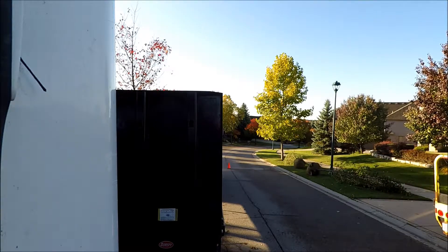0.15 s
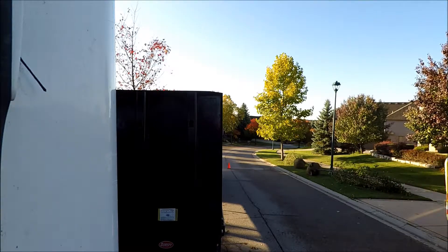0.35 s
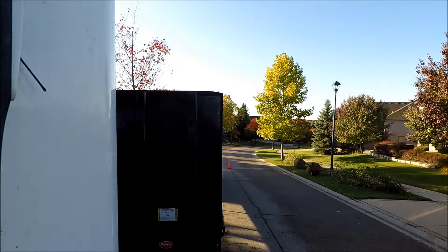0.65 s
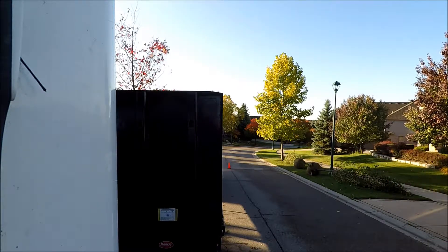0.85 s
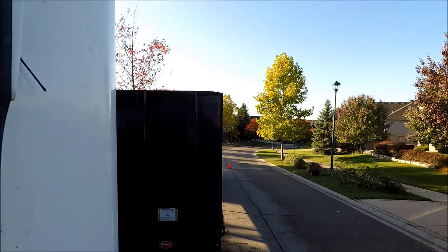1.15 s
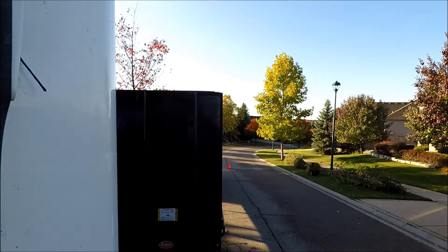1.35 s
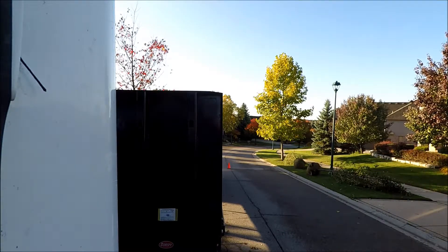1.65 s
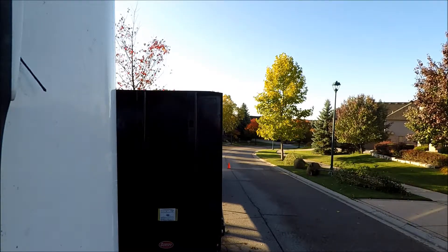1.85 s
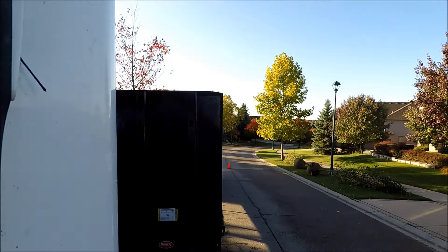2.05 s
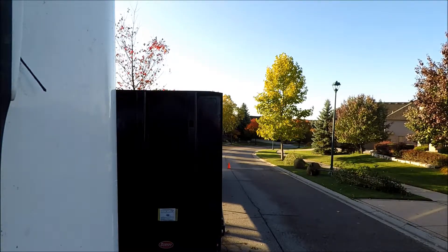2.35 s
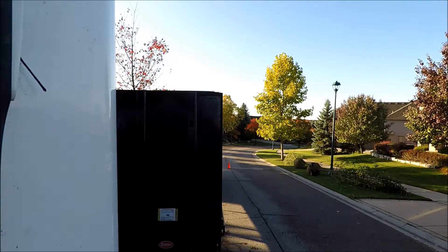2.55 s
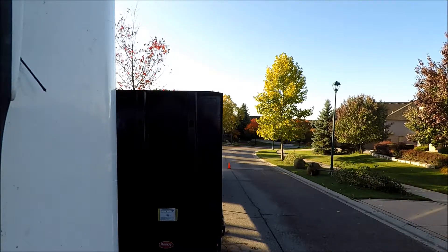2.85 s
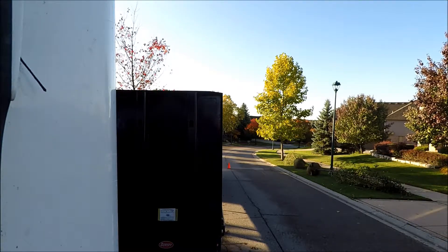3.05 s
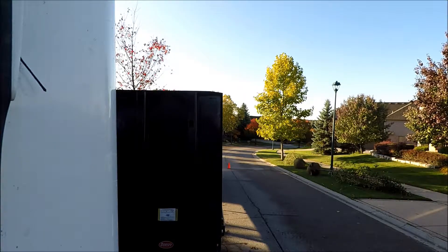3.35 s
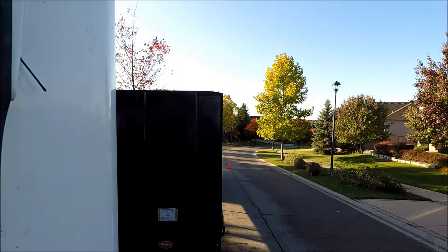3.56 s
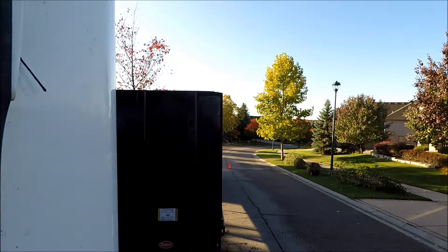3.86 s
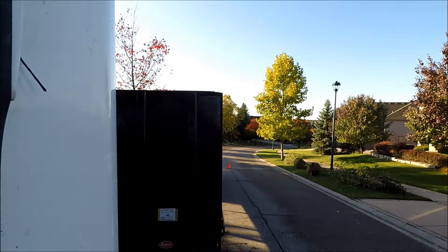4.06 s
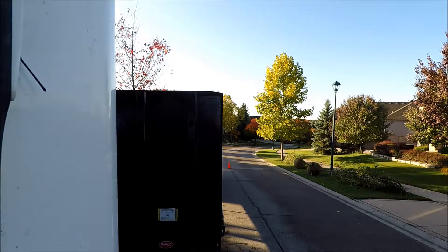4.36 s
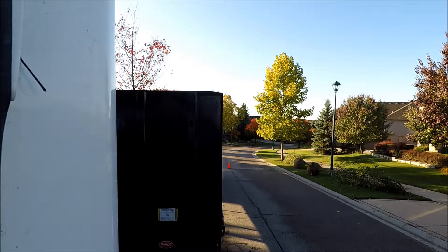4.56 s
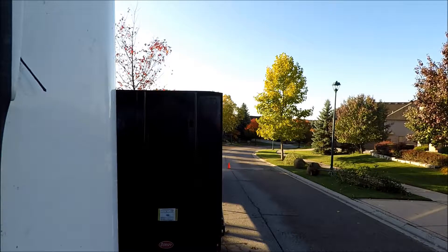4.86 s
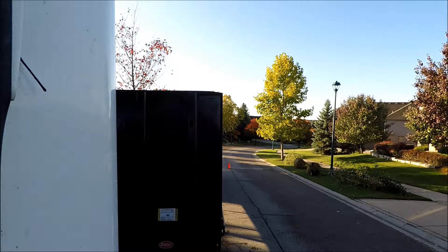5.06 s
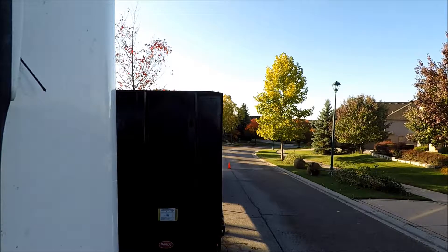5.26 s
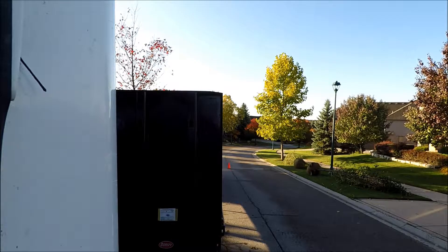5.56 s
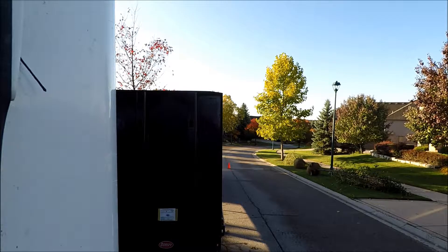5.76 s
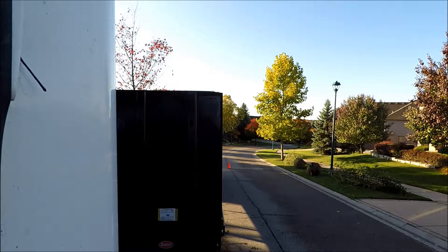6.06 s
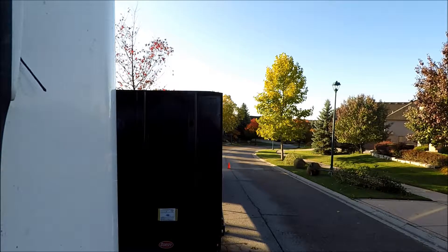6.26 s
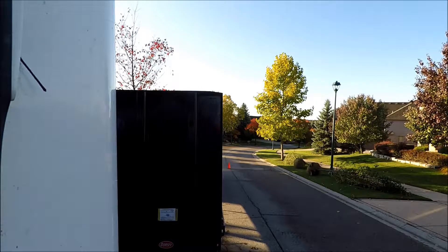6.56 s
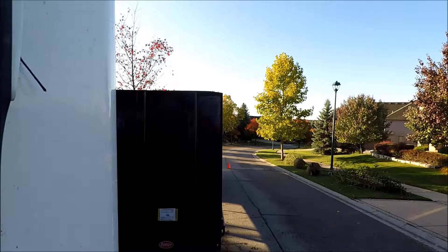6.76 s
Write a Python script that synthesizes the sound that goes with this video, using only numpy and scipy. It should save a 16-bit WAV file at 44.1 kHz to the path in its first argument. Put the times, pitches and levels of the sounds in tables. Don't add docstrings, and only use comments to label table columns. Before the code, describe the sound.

A heavy diesel truck starts close and loud, a low throbbing exhaust drone under coarse, bright clatter, with brief ringing from metal panels. Around 0.7 s several rapid hard knocks mark the load coming on and the engine pitch jumps upward. It holds, dips near 2.4 s, then climbs again until about 4 s, steadily fading with distance and losing its bright edge. Light wind pops hit the left side near 3.9 s. From 4.2 to 5.5 s the engine winds down, with very faint high brake squeaks around 5 s; it briefly picks up, then vanishes behind houses by 5.9 s. A second truck's slow, uneven idle is now plain beside the microphone, puttering and knocking, sagging then recovering near 6.3 s. A soft wind thump comes at 6 s, a sharp squeak at 6.3, left-side pops near 6.6, and a low rising body groan from 6.8 to the end.

```python
import sys
import numpy as np
from scipy import signal
from scipy.fft import rfft, irfft, next_fast_len
from scipy.io import wavfile
from scipy.ndimage import uniform_filter1d

SR = 44100
rng = np.random.default_rng(int(sys.argv[2]) if len(sys.argv) > 2 else 0)


def linear_from_db(decibels):
    return 10 ** (np.asarray(decibels, float) / 20)


def wav_out(sig):
    wavfile.write(sys.argv[1], SR, np.round(np.clip(np.atleast_2d(sig).T, -1, 1) * 32767).astype(np.int16))


N = 304290
T = np.arange(N) / SR
F = np.maximum(np.fft.rfftfreq(next_fast_len(N + 8192, True), 1 / SR), 1)
PAD = 2 * (len(F) - 1)

# frequency in Hz, level in dB per Hz.
CLATTER = [(600, -6.5), (900, -1.5), (1500, 0.5), (2900, -2), (3700, -1), (4300, -6.5), (5500, -5.5),
           (6800, -6.5), (7800, -14.5), (9000, -25.5), (10200, -20.5), (10900, -37.5), (12900, -29),
           (13700, -61)]
# frequency in Hz, lead in radians.
LEAD_NEAR = [(690, -.1), (1030, .8), (1380, 2.3), (2070, 4.2), (3450, 6.1), (4130, 7.3), (6200, 8.0),
             (7300, 9.6), (8300, 9.4), (8900, 12.6), (9550, 15.7), (10300, 17.2), (11500, 18.6),
             (13500, 18.8)]
# frequency in Hz, lead in radians.
LEAD_FAR = [(690, -.1), (1030, 1.7), (1380, 3.1), (2750, 5.6), (3300, 6.5), (4300, 11.3), (5340, 12.6),
            (6300, 9.8), (7500, 9.4), (8700, 12.8), (9500, 15.7), (10300, 18.2), (11000, 19.6),
            (13500, 18.8)]


def leaving_truck():
    # time in seconds, firing rate in Hz, load in dB.
    engine = [(0.0, 48.65, -1), (0.3, 49.98, -1), (0.67, 50.6, 0), (0.79, 55.0, 2), (0.89, 55.38, 0),
              (1.2, 54.64, 1), (1.87, 54.77, 1.1), (2.38, 51.14, -0.16), (2.9, 52.6, 0), (3.3, 53.37, 2.3),
              (3.7, 54.8, 0.5), (4.17, 54.6, 1), (4.39, 51.6, 0.5), (4.7, 47.9, .4), (5.17, 43.6, -1.2),
              (5.55, 42.97, -1.5), (5.7, 46.2, -8.5), (5.9, 48.4, 4)]
    # frequency in Hz, level in dB per Hz.
    rumble_colour = [(20, 15), (40, 5), (100, 8.5), (200, 7), (260, 4), (420, 7.5), (530, 1), (670, 2),
                     (820, -16), (1000, -37)]
    hz, load_db = curves(engine)
    rumble_db = -32.5 - 1.43 * T + 0.59 * load_db
    clatter_db = -29 - 2 * T + load_db
    gone = fade(-1, 5.88, 0.17)
    turns = np.cumsum(hz * (1 + 0.003 * walk(25))) / SR
    orders = exhaust_orders(turns, hz, load_db) + upper_orders(turns, rumble_db)
    rumble_swell = linear_from_db(rumble_db + 2.5 + 1.46 * walk(9)) * bursts(turns, 0.48, 0.24, 3.8)
    rumble = gas(gone * rumble_swell, rumble_colour)
    return ports(np.sqrt(2) * gone * orders) + rumble + block_clatter(turns, clatter_db, gone)


def exhaust_orders(turns, hz, load_db):
    out = np.zeros(N)
    for k in range(4):
        phase = (k + 1) * 2 * np.pi * turns + 0.16 * k ** 3
        out += linear_from_db(order_db(k + 1, hz, load_db)) * np.cos(phase)
    return out


def order_db(order, hz, load_db):
    # frequency in Hz, level in dB of an order at that pitch.
    pipe = [(43, -30.5), (55, -25), (87, -19), (110, -22), (148, -23), (166, -29.5), (182, -37.5),
            (205, -34.5)]
    # middle in seconds, order, half length in seconds,
    # gain in dB.
    echoes = [(0.903, 2, 0.17, -3), (.9, 3, 0.15, -3), (2.5, 1, .4, -3), (2.967, 3, .08, -8),
              (3.205, 2, 0.28, -2.5), (5.2, 3, 0.36, 2.5), (4.213, 2, .1, -9.5), (4.404, 2, 0.13, 4),
              (4.403, 3, .15, -3.5), (4.582, 1, 0.041, -17), (4.6, 2, 0.11, -6), (4.625, 3, 0.085, -11),
              (5.108, 2, .15, -6), (4.25, 1, 0.22, 3), (5.68, 1, .25, 14.5), (5.693, 2, 0.045, -14),
              (5.661, 3, 0.038, 9)]
    pipe_hz, pipe_db = np.transpose(pipe)
    db = np.interp(np.log(order * hz), np.log(pipe_hz), pipe_db)
    db = db + 0.95 * load_db - 1.08 * T
    db = db - 7.5 * fade(5.55, 9, 0.069)
    for s, k, half, gain_db in echoes:
        if round(k) == order:
            db = db + gain_db * fade(s - half, s + half, half)
    flutter_db = 0.3 + 0.08 * T
    return db + flutter_db * order / 2 * walk(20)


def upper_orders(turns, rumble_db):
    # multiple of the firing rate, level in dB under the rumble, start and end in seconds.
    upper = [(5, -9, 1, 1.07), (5.03, -7.5, 3.5, 5.2), (6, -12.5, 0, .7), (6.01, -7, 3.5, 4.35),
             (7.01, -9, 0.5, 3.5), (8.05, -9.5, 0, 3.9), (9.01, -13.5, 1, 3.31), (12, -16, 0.5, 5),
             (17.98, -12.5, 0.8, 2.38), (17.73, -13.5, 2.9, 3.5)]
    shivering = turns + 0.015 * walk(15)
    out = np.zeros(N)
    for k, db, start_s, end_s in upper:
        level = linear_from_db(db + rumble_db + 2.6 * walk(12))
        out += fade(start_s, end_s, 0.07) * level * np.sin(k * 2 * np.pi * shivering + k * k)
    return out


def block_clatter(turns, clatter_db, gone):
    # frequency in Hz, width in Hz, level in dB under the clatter.
    block_modes = [(1246, 33, -21), (1920, 58, -18), (2660, 380, -11.5), (3085, 120, -16.5),
                   (3700, 66, -19.5), (4520, 180, -22), (5400, 210, -18.5), (6100, 29, -20)]
    struck = turns + 0.45
    envelope = gone * linear_from_db(clatter_db + 1.5 + 0.4 * walk(6)) * bursts(struck, 0.52, 0.17, 1.7)
    far = fade(0.85, 9, 1.93)
    modes = linear_from_db(clatter_db + 0.7) * struck_modes(gone * blows(struck), block_modes)
    near_clatter = gas(envelope * np.sqrt(1 - far), CLATTER, LEAD_NEAR)
    far_clatter = gas(envelope * np.sqrt(far), shaded(CLATTER))
    return ports(modes) + near_clatter + far_clatter


def shaded(colour):
    # frequency in Hz, gain in dB.
    shade = [(900, 0.5), (1400, -1.5), (2500, 0), (3400, -3.5), (4100, 3), (5500, 0), (7300, 2),
             (9700, 0.5)]
    colour_hz, colour_db = np.transpose(colour)
    shade_hz, shade_db = np.transpose(shade)
    hz = np.sort(np.concatenate([colour_hz, shade_hz]))
    db = np.interp(np.log(hz), np.log(colour_hz), colour_db)
    db = db + np.interp(np.log(hz), np.log(shade_hz), shade_db)
    return np.column_stack([hz, db])


def gear_change():
    # start in seconds, peak in dB.
    shift = [
        (0.7093, -9),
        (0.729, -11),
        (0.7487, -10),
        (0.7694, -19),
        (0.7894, -25),
    ]
    return linear_from_db(-13.5) * knocks(shift, 0.0023, LEAD_NEAR)


def idling_truck():
    # time in seconds, firing rate in Hz, pulses in dB, knock in dB.
    idle = [
        (0, 26.87, -58, -47),
        (2.5, 26.77, -43, -44.5),
        (5.3, 26.91, -36, -43),
        (5.7, 25.92, -30, -48),
        (6.0, 25.89, -35.5, -48),
        (6.27, 27.33, -30, -45.5),
        (6.45, 26.96, -33.5, -48),
        (6.9, 26.93, -31.5, -44),
    ]
    # frequency in Hz, width in Hz, level in dB.
    pipe_modes = [(55, 6.1, -9), (83, 17, -3.5), (126, 68, -10), (186, 55, -23)]
    # frequency in Hz, level in dB per Hz.
    knock_colour = [(25, 20.5), (100, 17), (250, 10), (500, 3), (800, -4.5), (1300, -3.5), (2200, -2),
                    (3000, -7), (3900, -7), (4600, -7.5), (5500, -13), (6600, -5.5), (8000, -18),
                    (13500, -35.5)]
    # frequency in Hz, width in Hz, level in dB.
    knock_modes = [(2030, 350, -3.5), (2820, 130, -8), (4600, 250, -13), (6600, 220, -26)]
    # start in seconds, level in dB.
    rattle = [(5.76, -42), (5.87, -52), (5.955, -43.5), (6.03, -45), (6.235, -43), (6.51, -48),
              (6.725, -43.5)]
    hz, pulse_db, knock_db = curves(idle)
    turns = np.cumsum(hz * (1 + 0.012 * walk(14))) / SR
    pulses = firings(turns, 2.2)
    pipe = np.zeros(N)
    for k, (mode_hz, width_hz, db) in enumerate(pipe_modes):
        rung = ring(ring(pulses, mode_hz, width_hz), mode_hz, width_hz)
        pipe += (-1) ** k * linear_from_db(db) * unit(rung)
    knock = gas(linear_from_db(knock_db + 10 + 0.8 * walk(7)) * bursts(turns, 0.28, 0.14, 3.0), knock_colour)
    modes = linear_from_db(knock_db - 6.5) * struck_modes(blows(turns), knock_modes)
    return ports(linear_from_db(pulse_db) * pipe + modes) + knock + knocks(rattle, 0.0089, LEAD_FAR)


def squeals():
    # start in seconds, length in seconds, start Hz, end Hz, level in dB.
    rings = [(0.028, 0.31, 3880, 3700, -36.5), (.96, .18, 1940, 1990, -39), (1.204, 0.48, 3520, 3280, -37),
             (1.231, .2, 5500, 5550, -43), (0.704, 0.031, 7500, 7540, -43), (0.724, .07, 5300, 5400, -37),
             (3.013, 0.085, 5340, 5400, -32.5), (4.695, .06, 11420, 11450, -51)]
    # start in seconds, length in seconds, start Hz, end Hz, level in dB.
    squeaks = [
        (4.958, 0.079, 11700, 11900, -62),
        (5.03, 0.12, 11900, 11550, -56),
        (6.157, 0.15, 6600, 6600, -62),
        (6.23, 0.035, 940, 953, -51),
        (6.321, 0.054, 6700, 6500, -36.5),
        (6.366, .06, 6500, 6400, -47.5),
        (6.555, 0.076, 2350, 2300, -46),
        (6.61, 0.086, 870, 881, -51),
        (6.771, 0.17, 430, 520, -37.5),
        (6.8, 0.1399, 455.6, 465, -39),
    ]
    # frequency in Hz, level in dB.
    brake_modes = [(11470, -60.5), (11850, -64), (12150, -68), (12530, -67)]
    # frequency in Hz, lead of the left port in radians.
    squeal_lead = [(5600, 0), (6400, 1.9), (7000, 1.9), (8000, 0)]
    rows = [(*row, 181.4) for row in rings]
    rows += [(*row, 1.1 * np.sqrt(row[2])) for row in squeaks]
    rows += [(4.7, 0.46, hz, hz, db, 201) for hz, db in brake_modes]
    out = np.zeros(N)
    waver, throb = walk(1100), walk(70)
    for k, (s, length, start_hz, end_hz, db, waver_hz) in enumerate(rows):
        u = np.linspace(0, 1, int(length * SR))
        own = 9000 * k + np.arange(len(u))
        hz = start_hz + (end_hz - start_hz) * u + waver_hz * waver[own]
        shape = np.minimum(8 * u, 1) * np.minimum(3 * (1 - u), 1)
        tone = linear_from_db(db + 1.5 * throb[own]) * shape * np.sin(2 * np.pi * np.cumsum(hz) / SR)
        at = int(s * SR)
        out[at:at + len(u)] += tone[:N - at]
    return ports(out, lead=squeal_lead)


def wind():
    # start in seconds, level in dB, centre in Hz.
    pop_table = [(3.85, -14, 450), (3.88, -28, 400), (3.921, -14, 400), (4.0, -27, 699),
                 (5.082, -36, 491.4), (6.59, -17.5, 436), (6.63, -23, 430), (6.688, -20, 400),
                 (6.719, -26, 300), (6.74, -22, 250)]
    # start in seconds, level in dB, frequency in Hz.
    thump_table = [
        (1.98, -33, 28),
        (4.58, -36, 29.9),
        (5.994, -20.5, 30.2),
    ]
    # start in seconds, length in seconds, level in dB.
    rustle_table = [(1.896, 0.17, -29), (3.79, 0.16, -27), (3.98, 0.042, -29), (4.5, 0.091, -42),
                    (5.028, 0.1, -29.5), (5.38, 0.068, -35), (5.652, 0.26, -53), (6.102, 0.07, -38.5),
                    (6.58, 0.075, -36), (6.668, 0.1, -39)]
    pops = sum(puff(*row, 0.49) for row in pop_table)
    thumps = sum(puff(*row, 1.0) for row in thump_table)
    gusts = sum(linear_from_db(db) * fade(s, s + length, length / 3) for s, length, db in rustle_table)
    gusts = gusts * linear_from_db(3.0 * walk(90))
    rustle = gusts * dull(ring(rng.standard_normal(N), 150, 210), 820)
    breeze = linear_from_db(-39.5 + 0.67 * walk(5)) * dull(rng.standard_normal((2, N)), 223)
    left = pops + rustle
    return np.array([left + thumps, 0.033 * left + thumps]) + breeze


def puff(s, db, hz, cycles):
    u = np.maximum(T - s, 0) * hz
    return linear_from_db(db) * np.sin(2 * np.pi * u) * np.exp(-u / cycles)


def ports(direct, diffuse=None, colour=((1, 0),), lead=LEAD_FAR):
    # frequency in Hz, likeness of the two ports from 0 to 1.
    likeness = [(170, .88), (500, .8), (800, .4), (1300, .75), (1700, .62), (2400, .92), (3400, .88),
                (4000, .5), (4700, .65), (5800, .45), (6800, .75), (8200, .7), (9500, .65), (13000, .3)]
    # frequency in Hz, left minus right in dB.
    tilt = [(60, 1.5), (110, 1.5), (200, 2.5), (360, 3.0), (660, 2.5), (1210, -2.0), (2200, -0.5),
            (4010, 1.0), (7310, 1.5), (13300, -1.0)]
    like = np.clip(over_hz(likeness), 0, 1)
    half = np.exp(0.5j * over_hz(lead)) * linear_from_db(over_hz(tilt) / 2)
    both = rfft(direct, PAD) * np.array([half, 1 / half])
    if diffuse is not None:
        both = np.sqrt(like) * both + np.sqrt(1 - like) * rfft(diffuse, PAD)
    return irfft(both * linear_from_db(over_hz(colour)), PAD)[:, :N]


def gas(envelope, colour, lead=LEAD_FAR):
    noise = rng.standard_normal((3, N)) * envelope
    return ports(noise[0], noise[1:], colour, lead) / np.sqrt(np.mean(linear_from_db(2 * over_hz(colour))))


def bursts(turns, share, decay, scatter_db):
    size = linear_from_db(scatter_db * rng.standard_normal(int(turns[-1]) + 2))[turns.astype(int)]
    u = turns % 1 / decay
    return unit(1 - share + share * size * u * np.exp(1 - u))


def firings(turns, scatter_db):
    return np.diff(np.floor(turns), prepend=0) * linear_from_db(scatter_db * rng.standard_normal(N))


def blows(turns):
    return uniform_filter1d(firings(turns, 1.8), size=400, origin=-199)


def struck_modes(hits, modes):
    out = np.zeros(N)
    for hz, width_hz, db in modes:
        narrow = ring(hits * rng.standard_normal(N), hz, width_hz)
        out += linear_from_db(db + 1.7 * walk(14)) * unit(ring(narrow, hz, 6 * width_hz))
    return out


def knocks(table, decay_s, lead):
    envelope = np.zeros(N)
    for s, db in table:
        u = np.maximum(T - s, 0) / decay_s
        envelope += linear_from_db(db) * u * np.exp(1 - u)
    return gas(envelope, CLATTER, lead)


def ring(x, hz, width_hz):
    return signal.lfilter(*signal.iirpeak(hz, hz / width_hz, SR), x)


def dull(x, top_hz):
    return unit(signal.sosfilt(signal.butter(4, top_hz, fs=SR, output="sos"), x))


def walk(rate):
    k = int(SR / rate)
    held = np.repeat(rng.standard_normal(N // k + 1), k)
    return 1.3 * uniform_filter1d(uniform_filter1d(held, k), k)[:N]


def fade(start_s, end_s, edge_s):
    return np.clip(np.minimum(T - start_s, end_s - T) / edge_s, 0, 1)


def curves(table):
    s, *columns = np.transpose(table)
    return [np.interp(T, s, c) for c in columns]


def over_hz(table):
    hz, value = np.transpose(table)
    return np.interp(np.log(F), np.log(np.maximum(hz, 1)), value)


def unit(x):
    return x / np.sqrt(np.mean(x ** 2))


def scene():
    return leaving_truck() + gear_change() + idling_truck() + squeals() + wind()


def band_limit(x):
    return signal.sosfilt(signal.butter(12, 13920, fs=SR, output="sos"), x)


def record(dry):
    return band_limit(dry)


dry = scene()
out = record(dry)
wav_out(out)
```